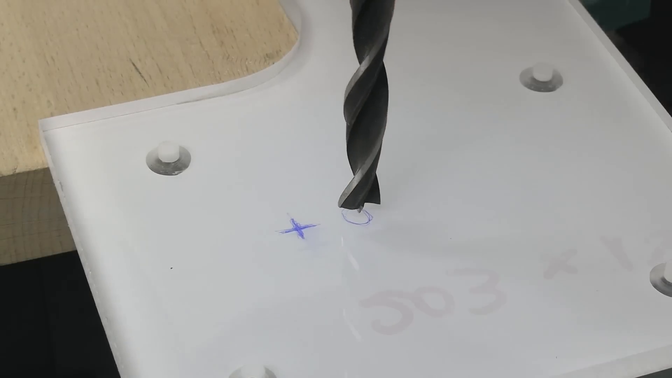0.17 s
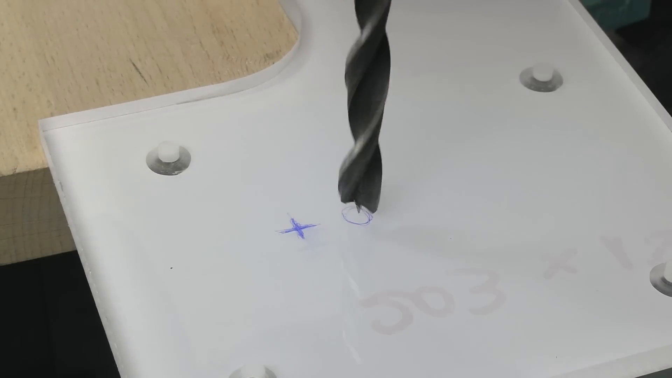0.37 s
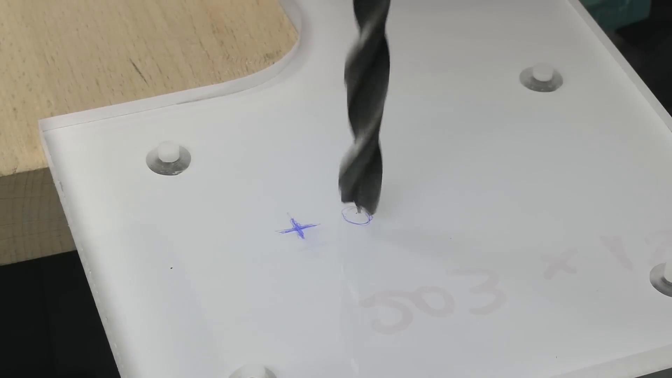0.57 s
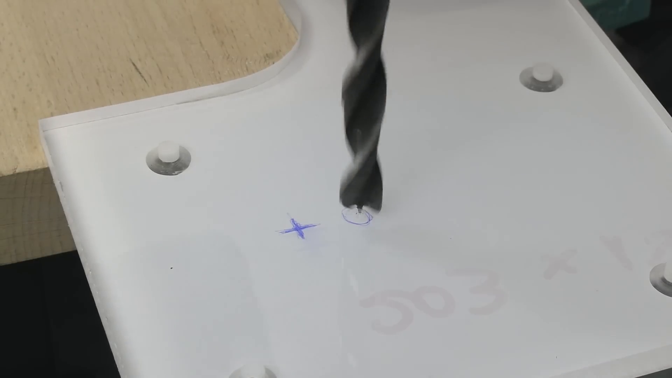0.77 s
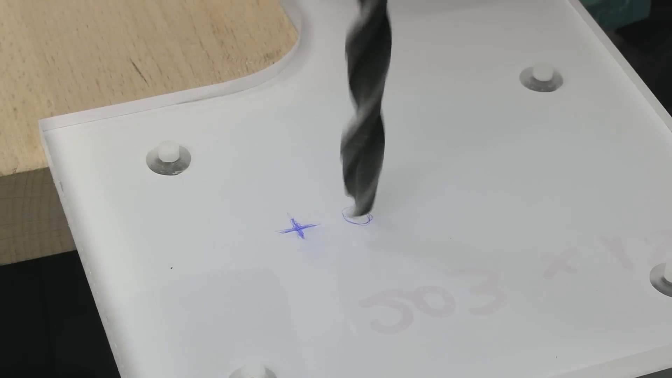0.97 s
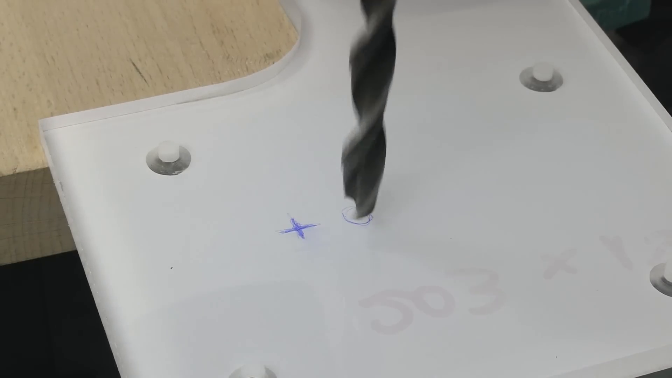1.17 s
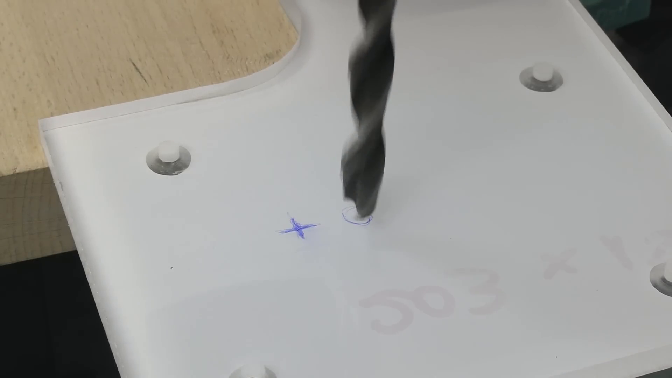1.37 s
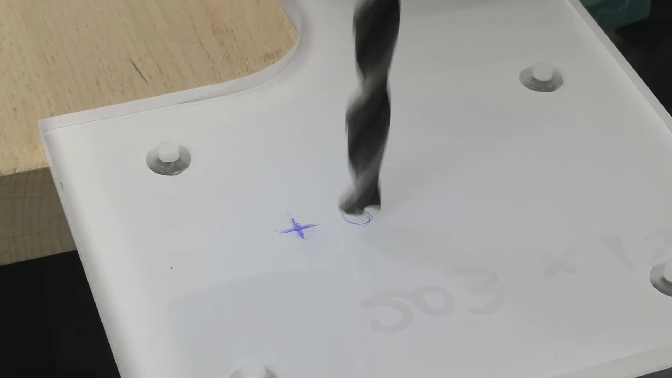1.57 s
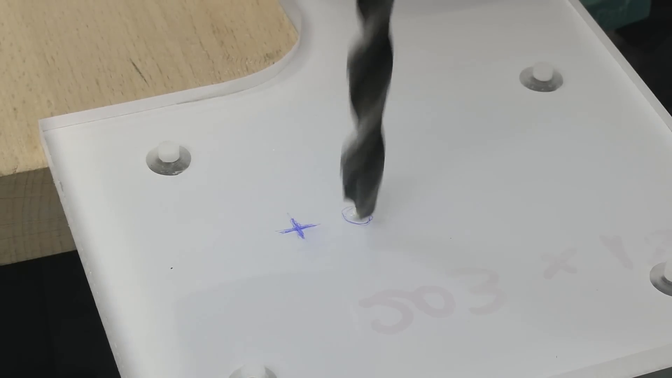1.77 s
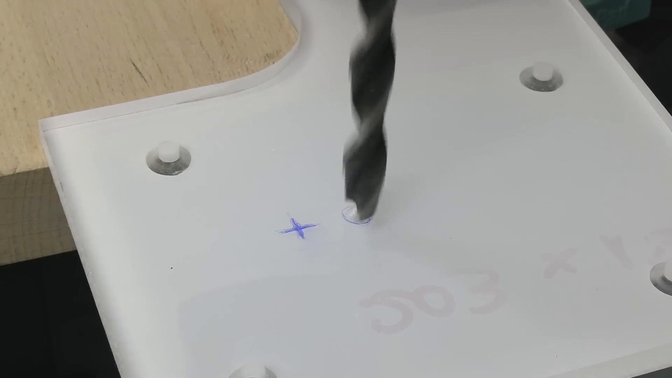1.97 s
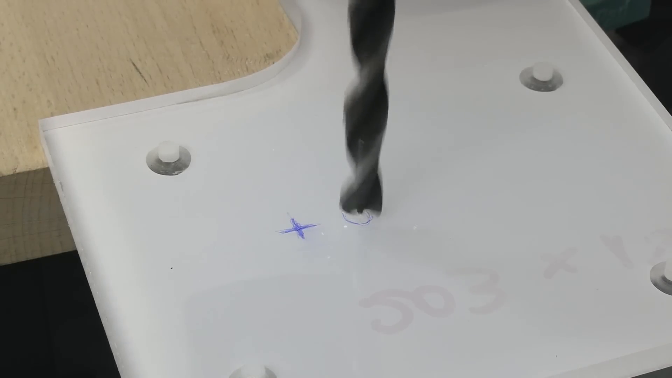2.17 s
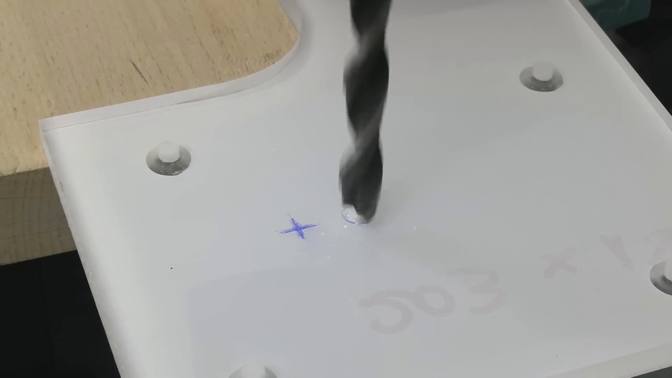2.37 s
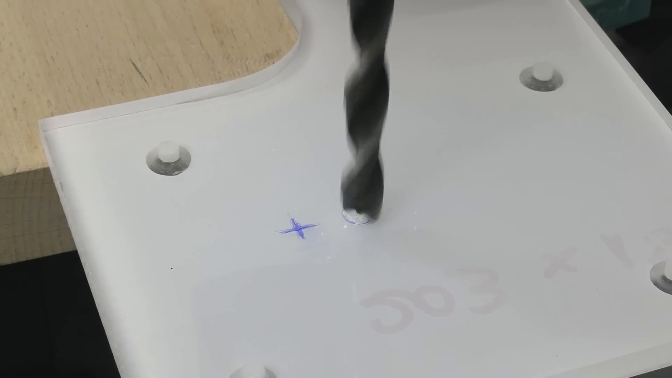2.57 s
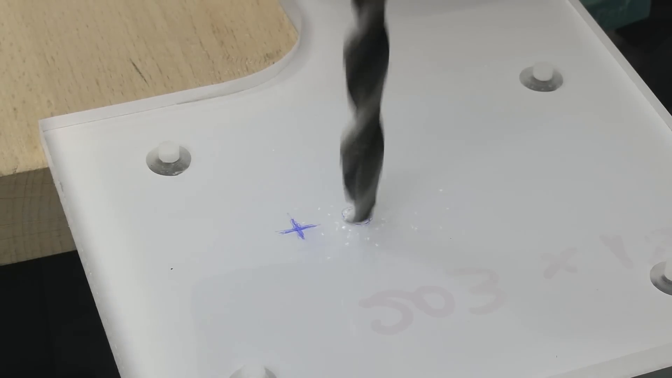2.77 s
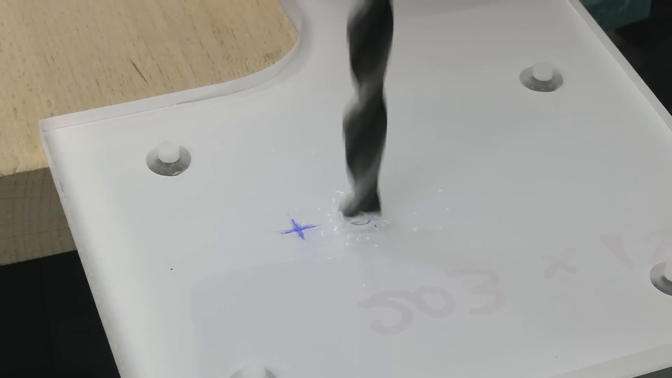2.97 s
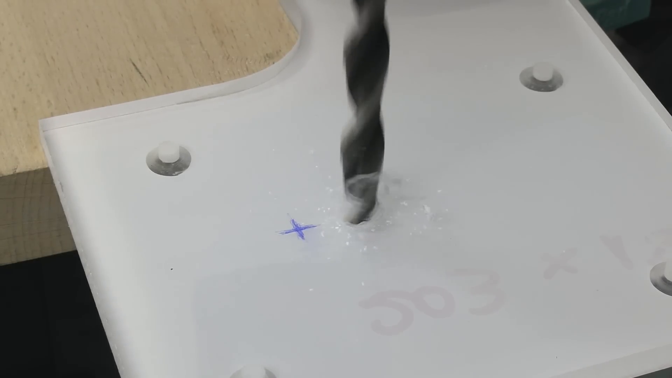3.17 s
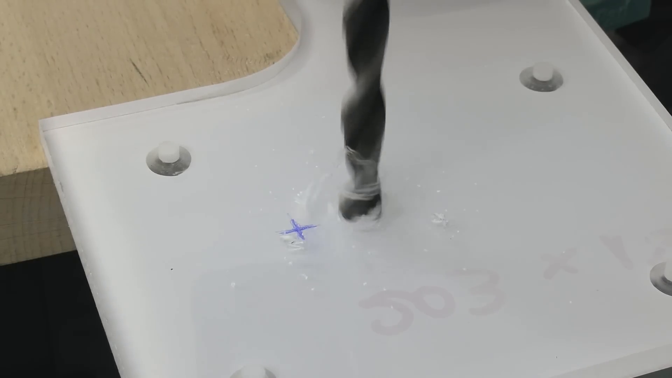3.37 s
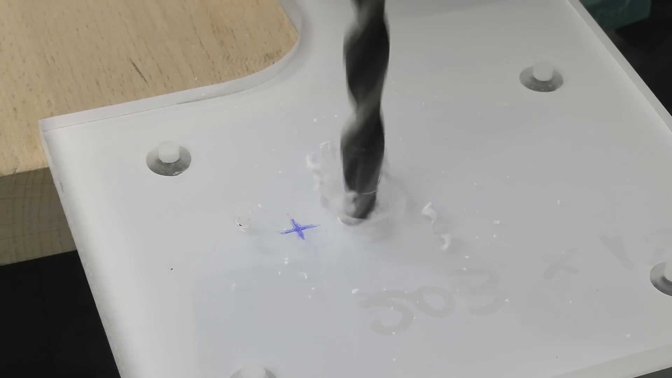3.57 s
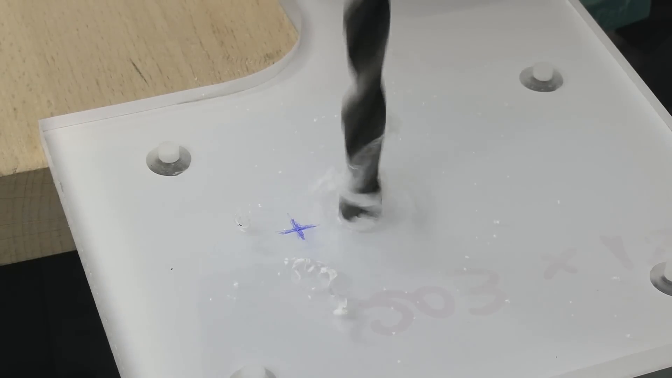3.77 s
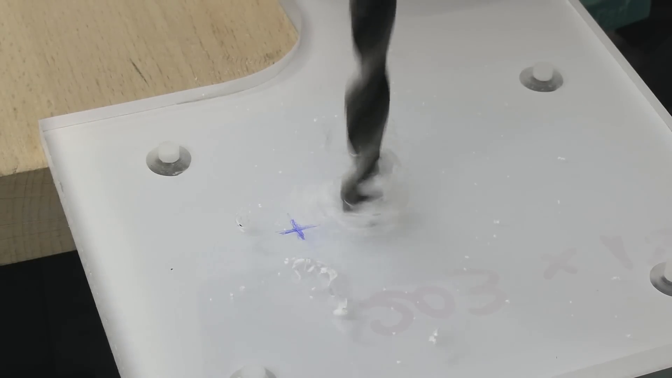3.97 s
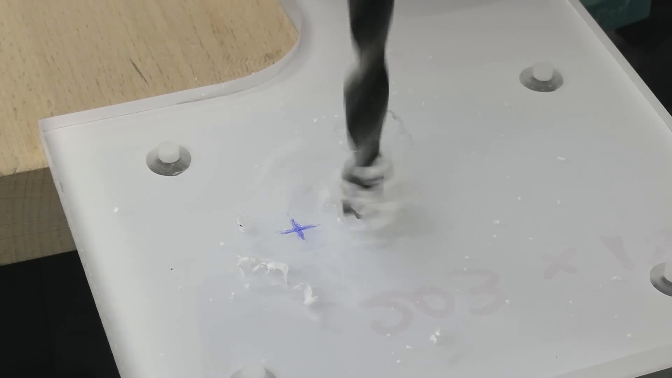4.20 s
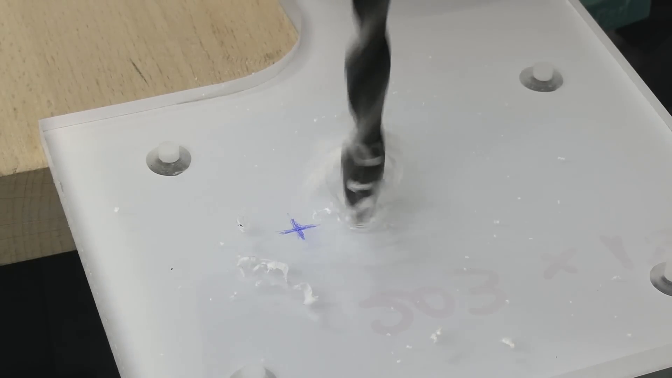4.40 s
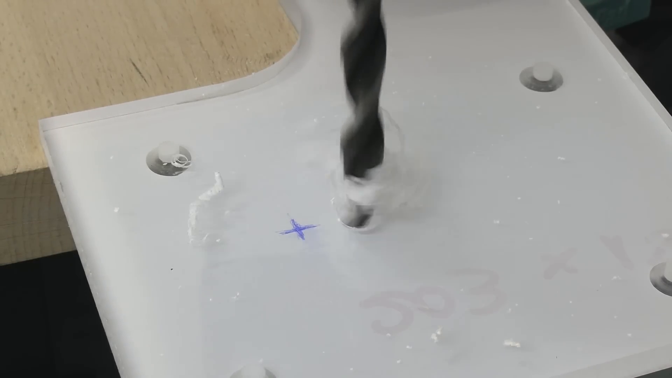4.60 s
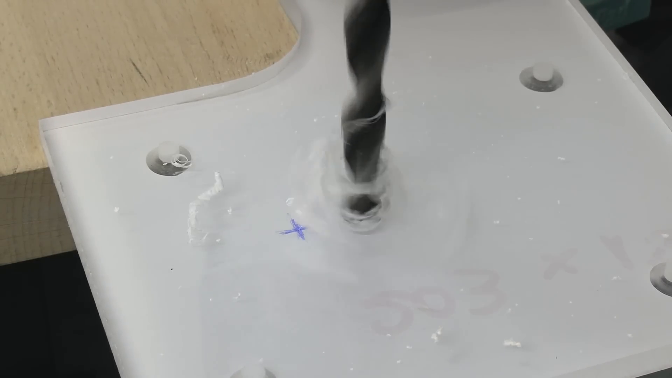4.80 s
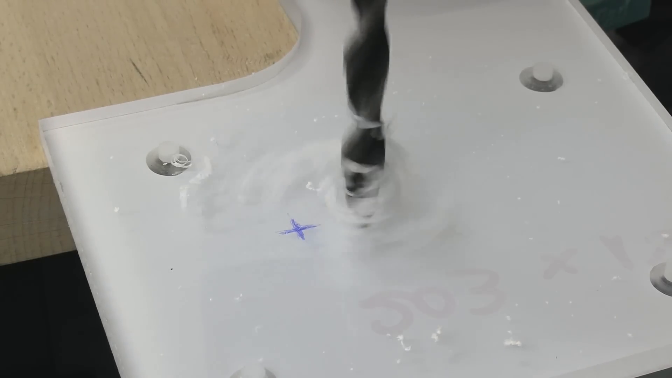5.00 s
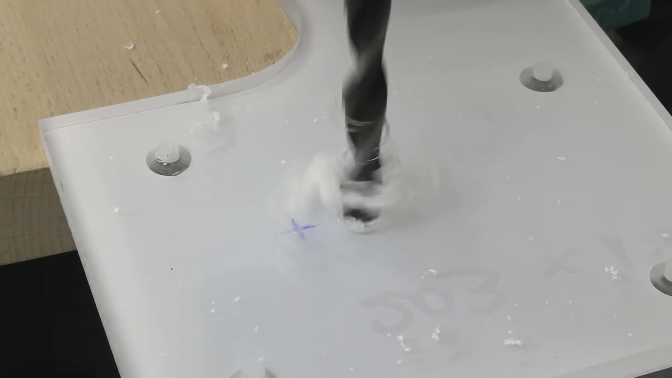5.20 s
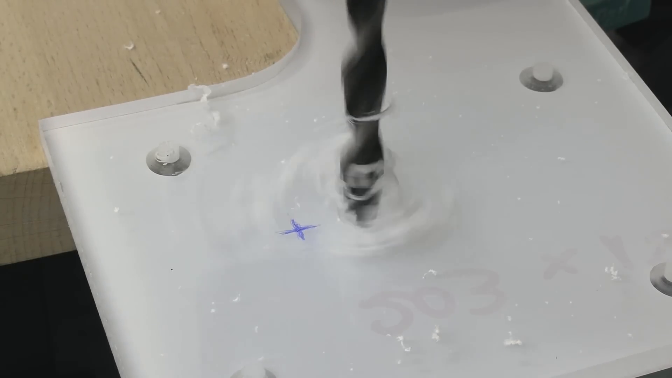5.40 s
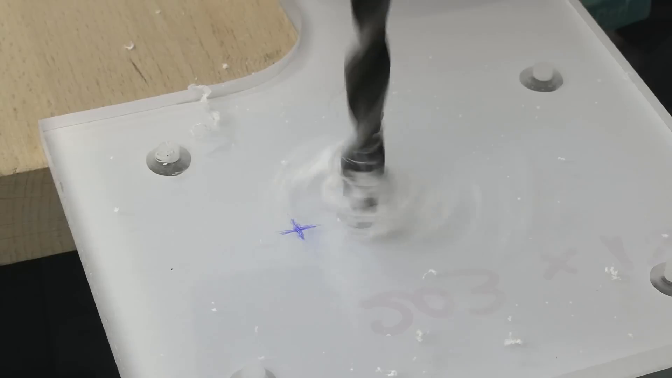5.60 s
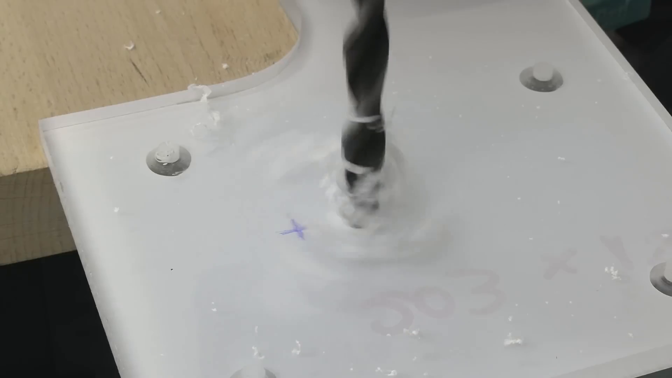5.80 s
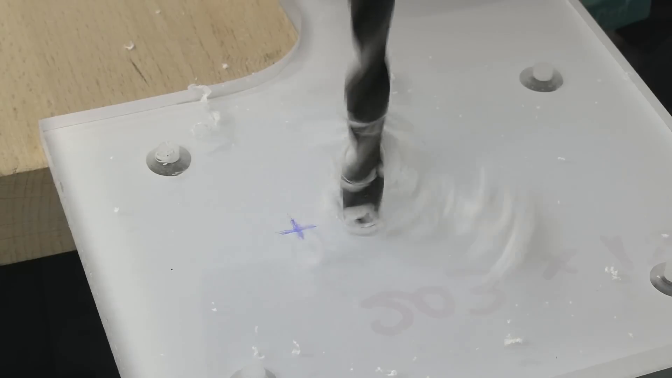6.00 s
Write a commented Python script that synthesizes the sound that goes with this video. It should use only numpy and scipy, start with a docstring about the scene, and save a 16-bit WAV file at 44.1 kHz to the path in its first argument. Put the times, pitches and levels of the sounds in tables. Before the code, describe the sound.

Close up, an electric drill clicks on, rises in pitch and bores through plastic with a steady, hissing whine.

```python
"""A cordless drill bores an acrylic sheet on a workbench, close up in a small workshop.
The tool clicks and its grip creaks; from 0.4 s the trigger is squeezed in steps, and the chopped drive
sings and rasps. The tip catches with a clunk, the fan's air buffets the microphone, and chips start
to tap on the sheet. At 2.1 s full throttle takes over with a steady whine and hiss. The gears sing
as the load grows, and from 3 s to 4.4 s the bit squeaks in the plastic."""
import sys
import numpy as np
from scipy import signal
from scipy.fft import rfft, irfft, next_fast_len
from scipy.io import wavfile
from scipy.ndimage import uniform_filter1d, map_coordinates

SR = 44100
rng = np.random.default_rng(int(sys.argv[2]) if len(sys.argv) > 2 else 0)


def store_wav(level_fs):
    """Save 16-bit WAV to argv[1]."""
    pcm = np.round(np.clip(np.atleast_2d(level_fs), -1, 1) * 32767)
    wavfile.write(sys.argv[1], SR, pcm.T.astype(np.int16))


N = 266805
T = np.arange(N) / SR

# Steady whine, before the housing's lift: (motor order, level running free [dB], level cutting [dB])
FULL_WHINE = [(2, -75, -52.5), (6, -49, -51), (12, -69, -63), (18, -61.5, -63)]
# Gear tones: (motor order)
GEAR_ORDERS = [1, 1.7, 4, 4.667, 5.05, 5.467, 5.6, 8, 10, 11.2, 16.43, 16.667, 17.35, 18.667, 19.95]
# Their mix, tone by tone: (relative level [dB])
GEAR_MIX = [-37, -34, -26, -23, -46, -19.5, -16.5, -24, -32, -18.5, -33, -16, -28, -20, -19]
# Bright hiss of fan and gears: (frequency [Hz], density [dB])
HISS_COLOUR = [(300, -56), (1500, -13.5), (2800, -11), (3500, -1), (4350, 1), (5100, -2), (5800, -1),
               (6500, 1.5), (8800, 4), (10400, 0), (12600, 4), (13900, 1.5), (15700, -1)]
# Darker whirr under it: (frequency [Hz], density [dB])
WHIRR_COLOUR = [(150, -30), (450, -12.5), (950, -13), (1400, -1), (1650, 5.5), (1850, -6.5), (2200, 5.5),
                (3200, 1), (6000, -6.5), (12000, -5)]

def full_throttle(angle, speed_hz, load):
    """The steady drive whines over the hiss of fan and gears; the gears sing as the bit takes load."""
    bite = 1 - np.exp(-load / .18)  # morphs the whine from free to cutting
    roar = np.minimum(load / .72, 1)  # the noise grows with load, then levels off
    whine = 0
    for order, free_db, cutting_db in FULL_WHINE:
        level_db = free_db + (cutting_db - free_db) * bite + housing(order * speed_hz)
        whine += amp(level_db) * motor_tone(angle, order, flutter_db=1.1, smear_rad=.025 * order)
    # play between the teeth blurs the high orders most
    gears = sum(amp(db) * motor_tone(angle, order, flutter_db=3, smear_rad=.5 + .13 * order)
                for order, db in zip(GEAR_ORDERS, GEAR_MIX))
    hiss = noise(HISS_COLOUR) * amp(.71 * wobble(700) + .44 * wobble(25))
    fan_and_gears = amp(-36 + 3 * roar) * (hiss + amp(-8.5 + 10 * roar) * gears)
    whirr = amp(-57 + 7 * roar) * noise(WHIRR_COLOUR) * amp(.8 * wobble(160))
    return (whine + fan_and_gears + whirr) * switch_on(2.076)


# Lead tones: (motor order, base level at top speed [dB], rise [dB/octave], left minus right [dB])
PART_WHINE = [(1, -68.5, 3, 1), (3, -54.3, -.3, 1.5), (6, -61, .5, 3), (9, -54.5, 2, -4.5),
              (12, -48.3, 4.5, -4), (15, -50, 12, -1), (18, -49, 6.5, 1)]
# Weaker tones around the lead: (motor order)
WEAK_ORDERS = [2, 4, 5, 17, 20, 21, 23, 24, 26, 27, 28, 30, 33, 36]
# Their mix, tone by tone: (relative level [dB])
WEAK_MIX = [-19.5, -18.5, -15.5, -37, -14, -14, -24, -11, -21, -33, -16, -15, -20, -21]
# Noise faders riding the speed: (motor speed [Hz], base rasp level [dB], base sizzle level [dB])
NOISE_BY_SPEED = [(80, -50, -70), (200, -46, -62), (260, -45.5, -49.5), (406, -38, -50), (590, -39.5, -39),
                  (710, -38.5, -38)]
# Gritty body of the chopped drive: (frequency [Hz], density [dB])
RASP_COLOUR = [(100, -50), (300, -40), (520, -23), (800, -11.5), (1250, -8.5), (1700, 0.5), (2800, -1),
               (4300, 5), (5200, 1), (6100, 3.5), (7500, -11), (9500, -0.5), (13000, -9.5)]
# Its fizzy top: (frequency [Hz], density [dB])
SIZZLE_COLOUR = [(3000, -41), (7000, 5.5), (9000, 1), (11000, 4.5), (12500, 0), (14000, -3), (16000, 0.5)]

def part_throttle(angle, speed_hz, top_speed_hz=800):
    """The chopped drive kicks three times a cycle: a whine that swells in resonances, a pulsing rasp."""
    speeds, *faders = np.transpose(NOISE_BY_SPEED)
    rasp_db, sizzle_db = (np.interp(speed_hz, speeds, db) for db in faders)
    octaves = np.log2(np.maximum(speed_hz, 1) / top_speed_hz)
    whine = 0
    for order, db, rise_db, pan_db in PART_WHINE:
        level_db = db + rise_db * octaves + housing(order * speed_hz) + 2 * wobble(24.6)
        pan = amp(pan_db * np.array([[.5], [-.5]]))
        whine += amp(level_db) * pan * motor_tone(angle, order, flutter_db=1.3, smear_rad=.3)
    # the tones rise out of the rasp as the rotor gathers speed, the weaker ones last
    whine *= amp(np.interp(speed_hz, [160, 268], [-20, 0]))
    weak_tones = sum(amp(db) * motor_tone(angle, order, flutter_db=2.5, smear_rad=.3)
                     for order, db in zip(WEAK_ORDERS, WEAK_MIX))
    whine += amp(rasp_db + np.interp(speed_hz, [270, 430], [-13, 1])) * weak_tones
    kicks = unit(1 + .13 * np.cos(3 * angle) + .13 * np.cos(6 * angle))
    rasp = amp(rasp_db + 2) * noise(RASP_COLOUR) + amp(sizzle_db + 1.5) * noise(SIZZLE_COLOUR)
    gate = switch_on(.4095) * (1 - switch_on(2.073))
    motor = (whine + rasp * kicks * amp(.4 * wobble(300))) * gate
    return low_cut(motor, corner_hz=470)  # the small housing radiates little bass


# Trigger squeezes: (time [s], target motor speed [Hz], spin-up time constant [s])
TRIGGER_STEPS = [(.4, 258.8, .039), (.624, 448.2, .039), (.752, 550.9, .107), (1.314, 703.7, .029),
                 (1.457, 768.9, .017), (2.307, 800, .018)]
# How hard the bit digs in: (time [s], load [0-1])
CUTTING_LOAD = [(2.07, 0), (2.28, .06), (2.36, .15), (2.9, .22), (3.25, .5), (3.85, .65), (4.4, .65),
                (5.1, .79), (5.75, 1)]

def rotor(full_load_sag_hz=22.8):
    """The rotor eases up to each new trigger setting and sags as the bit takes load."""
    load = envelope(CUTTING_LOAD)
    speed_hz, held_hz = np.zeros(N), 0
    for start, hz, lag in TRIGGER_STEPS:
        speed_hz += (hz - held_hz) * (1 - np.exp(-np.maximum(T - start, 0) / lag))
        held_hz = hz
    speed_hz -= full_load_sag_hz * load
    angle = 2 * np.pi * np.cumsum(speed_hz * (1 + .00034 * wobble(24.98))) / SR
    return angle, speed_hz, load


def motor_tone(angle, order, flutter_db, smear_rad):
    """A sine at order times the motor speed, fluttering in level and phase."""
    tone = np.sin(order * angle + smear_rad * wobble(45) + rng.uniform(0, 2 * np.pi))
    below_nyquist = order * np.gradient(angle) < np.pi
    return unit(tone * amp(flutter_db * wobble(60))) * below_nyquist


# Resonant peaks the whine sweeps through: (centre [Hz], width [Hz], lift [dB])
HOUSING_PEAKS = [(540, 120, 7), (1300, 340, 18), (2310, 130, 6.5), (2670, 220, 23), (3880, 380, 20),
                 (4600, 400, 4), (6250, 600, 5), (7750, 260, 6), (9420, 850, 11), (14350, 250, 8)]

def housing(hz, ring_up_s=.052):
    """The housing's lift in dB for a moving tone; a fast sweep hardly wakes a resonance."""
    lift_db = sum(db / (1 + (2 * (hz - centre) / width) ** 2) for centre, width, db in HOUSING_PEAKS)
    return uniform_filter1d(lift_db, size=int(ring_up_s * SR))


# Squeak cues: (time [s], length [s], pitch [Hz], relative level [dB])
SQUEAK_CUES = [(3.03, 0.011, 9800, -37), (3.083, 0.0096, 9750, -35.5), (3.131, 0.0185, 9700, -33.5),
               (3.204, 0.017, 9700, -36.5), (3.282, 0.033, 9900, -35), (3.355, .027, 9500, -37),
               (3.498, .026, 9900, -40.5), (3.596, 0.021, 10200, -37), (3.886, 0.021, 6560, -41),
               (4.044, 0.015, 6480, -38.5), (4.347, .012, 7000, -40)]

def bit_squeaks(slip_s=.0086, glide=.162, roughness=.65):
    """The cutting edge sticks and slips: each squeak is a short run of harsh, gliding slips."""
    out = np.zeros(N)
    for start, length, hz, db in SQUEAK_CUES:
        slip_count = max(round(length / slip_s), 1)
        slip, progress = np.divmod(np.linspace(0, slip_count, int(length * SR), endpoint=False), 1)
        up_or_down = rng.choice([-1, 1], size=16)[slip.astype(int)]
        phase = 2 * np.pi * np.cumsum(hz * (1 + glide * up_or_down * (progress - .5))) / SR
        # uneven slips smear the tone into a band
        grit = roughness * unit(uniform_filter1d(rng.standard_normal((2, 4096)), size=20))[:, :len(slip)]
        tone = np.sin(phase) * (1 + grit[0]) + np.cos(phase) * grit[1]
        swell = np.sqrt(np.abs(np.sin(np.pi * progress)))
        add(out, start, amp(db + 3) * swell * tone)
    return low_cut(out, corner_hz=4000)


# Hollow midrange of the clunk: (frequency [Hz], density [dB])
CLUNK_COLOUR = [(100, -45), (280, -12), (450, -4), (750, 10), (1200, -2), (2000, 9.5), (3500, -43)]

def tip_catch(start_s=.794, attack_s=.0058, t60=.13):
    """The tip grabs the surface with one clunk."""
    t = np.maximum(T - start_s, 0)
    return amp(-32 - 60 * t / t60) * (1 - np.exp(-t / attack_s)) * noise(CLUNK_COLOUR)


# Accent knocks of bit and chips: (time [s], base level of each mode [dB], pitch [Hz])
TAP_ACCENTS = [(1.874, -46, 367), (2.129, -49.5, 460), (2.219, -52, 734), (2.311, -55, 420),
               (2.754, -54, 578), (4.11, -55, 550), (4.219, -51, 370), (5.003, -50, 493), (5.086, -51, 410),
               (5.633, -45.5, 550), (5.718, -53, 400), (5.911, -49, 445)]

def chip_taps(from_s=1.7, small_count=110, attack_s=.0021, t60=.029):
    """Chips knock dully on the clamped sheet; many small ones fall between the loud ones."""
    out, t = np.zeros(N), np.arange(SR // 10) / SR
    spacing_s = (N / SR - from_s) / small_count
    small_taps = [(from_s + spacing_s * (i + delay), -66 + 10 * force ** 2, 403 + 322 * pitch)
                  for i, (delay, force, pitch) in enumerate(rng.random((small_count, 3)))]
    for start, db, hz in list(TAP_ACCENTS) + small_taps:
        # each blow wakes a different handful of the sheet's modes
        ratios = (1, rng.uniform(.72, .746), rng.uniform(.934, 1.64))
        ring = sum(np.sin(2 * np.pi * (hz * ratio * t + rng.random())) for ratio in ratios)
        add(out, start, amp(db - 60 * t / t60) * (1 - np.exp(-t / attack_s)) * ring)
    return out


# The tool is set and switched on: (time [s], relative level [dB])
CLICK_CUES = [(0.0094, -24), (0.4034, -45), (0.4115, -35)]
# Crisp EQ for those clicks: (frequency [Hz], gain [dB])
CLICK_EQ = [(100, -34), (1000, -6.5), (2400, -2), (4500, -4.5), (9000, -7.5), (15500, -15)]
# Grip and trigger creak: (time [s], relative level [dB])
CREAK_CUES = [(0.1925, -42), (0.2523, -48), (0.2695, -48), (0.2945, -54), (0.3665, -50)]
# Duller EQ for the creaks: (frequency [Hz], gain [dB])
CREAK_EQ = [(300, -32), (1300, -10), (2000, 1), (3000, -4.5), (4500, -13), (12000, -23)]

def handling():
    """The tool's plastic body clicks and creaks in tiny bursts of noise."""
    out, t = np.zeros(N), np.arange(SR // 50) / SR
    for cues, eq, t60 in (CLICK_CUES, CLICK_EQ, .0053), (CREAK_CUES, CREAK_EQ, .008):
        bursts = np.zeros(N)
        for start, db in cues:
            add(bursts, start, amp(db + 5 - 60 * t / t60) * rng.standard_normal(len(t)))
        out += filtered(bursts, lambda hz: amp(along(eq, hz)))
    return out


# Fader ride of the fan's air: (time [s], relative level [dB])
DRAUGHT_FADER = [(0.88, -87), (1.0, -73), (1.28, -67.5), (1.42, -58.5), (2.05, -63.5), (2.6, -83),
                 (6.05, -82)]
# Its low buffeting: (frequency [Hz], density [dB])
DRAUGHT_COLOUR = [(20, -14), (70, -19), (140, -5.5), (250, 0.5), (420, -6), (650, -20), (1500, -22)]
# Its near-mono image: (frequency [Hz], left-right correlation [0-1])
DRAUGHT_IMAGE = [(60, .95), (130, 0.98), (300, 0.96), (700, 1)]

def fan_draught():
    """Air from the motor fan flutters on the microphone."""
    buffeting = unit(noise(DRAUGHT_COLOUR, DRAUGHT_IMAGE) * amp(3.3 * wobble(55)))
    return amp(envelope(DRAUGHT_FADER) + .5) * buffeting


# Tight room decay: (frequency [Hz], t60 [s])
WORKSHOP_DECAY = [(200, 0.071), (2500, 0.21), (12000, 0.22)]

def workshop_reverb(send):
    """The walls return a short tail, different on each side."""
    hz, t, spectra = signal.stft(rng.standard_normal((2, SR // 3)), SR, nperseg=256)
    decay = amp(-60 * t / along(WORKSHOP_DECAY, hz)[:, None])
    _, tail = signal.istft(spectra * decay, SR, nperseg=256)
    return signal.fftconvolve(send[None], tail / np.linalg.norm(tail[0]), axes=1)[:, :N]


# Background bed: (frequency [Hz], density [dB])
BED_COLOUR = [(18, -38), (30, -22), (140, -18), (263, -27), (432, -10), (546, -5), (639, -2.5),
              (2020, -7.5), (2760, -3.5), (15500, -15.5)]

def noise_bed():
    """A faint, steady rush lies under everything."""
    return amp(-74.5) * noise(BED_COLOUR)


# Default image, mono in the mids and wider on top: (frequency [Hz], left-right correlation [0-1])
NOISE_IMAGE = [(60, 0.75), (200, 1), (600, 1), (1200, 1), (2500, 1), (5000, 0.91), (9000, 0.72),
               (14000, 0.85)]

def noise(colour, image=NOISE_IMAGE):
    """Coloured stereo noise of rms 1."""
    def mid_side_gains(hz):
        width = np.arccos(np.clip(along(image, hz), -1, 1)) / 2
        return amp(along(colour, hz)) * [np.cos(width), np.sin(width)]
    mid, side = filtered(rng.standard_normal((2, N)), mid_side_gains)
    return unit(np.array([mid + side, mid - side]))


def amp(db):
    """Decibels to gain."""
    return 10 ** (np.asarray(db) / 20)


def unit(x):
    """Scaled to rms 1."""
    return x / np.sqrt(np.mean(x ** 2) + 1e-20)


def along(points, hz):
    """Read (frequency, value) points on a log axis."""
    freqs, values = np.transpose(points)
    return np.interp(np.log(hz + 1), np.log(freqs), values)


def envelope(points):
    """Join (time, value) points, one value a sample."""
    return np.interp(T, *np.transpose(points))


def wobble(rate):
    """A smooth random curve, rate knots a second."""
    return map_coordinates(rng.standard_normal(int(N * rate / SR) + 4), [T * rate], mode="nearest")


def filtered(x, response):
    """Shape x with a gain for each frequency."""
    size = next_fast_len(N + 8192)
    return irfft(rfft(x, size) * response(np.fft.rfftfreq(size, 1 / SR)), size)[..., :N]


def low_cut(x, corner_hz):
    """Roll off the lows at 24 dB an octave."""
    return filtered(x, lambda hz: hz ** 4 / np.hypot(hz ** 4, corner_hz ** 4))


def add(track, start_s, sound):
    """Mix a sound in at a time."""
    part = track[round(start_s * SR):][:len(sound)]
    part += sound[:len(part)]


def switch_on(start_s):
    """A 4 ms ramp from 0 to 1."""
    return np.clip((T - start_s) / .004, 0, 1)


def scene():
    """One shaft drives every motor tone; the walls return a little drill and more of the contacts."""
    angle, speed_hz, load = rotor()
    contacts = handling() + chip_taps() + bit_squeaks()
    drill = part_throttle(angle, speed_hz) + full_throttle(angle, speed_hz, load) + tip_catch()
    room = workshop_reverb(amp(-7.5) * contacts + amp(-28) * drill.mean(axis=0))
    return drill + contacts + room + fan_draught() + noise_bed()


# Master pan by band: (frequency [Hz], left minus right [dB])
MASTER_PAN = [(300, .4), (2000, .1), (4500, -.5), (8500, -1.3), (14000, -.6)]

def record(dry):
    """The treble leans to the right, and the very top is cut off."""
    return filtered(dry, lambda hz: amp(np.outer([.5, -.5], along(MASTER_PAN, hz))) * (hz < 15760))


dry = scene()
out = record(dry)
store_wav(out)
```